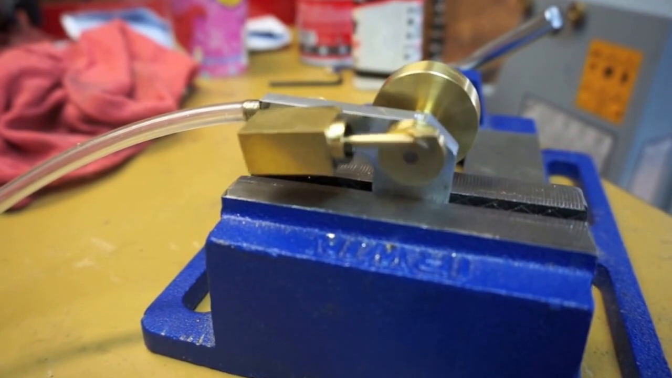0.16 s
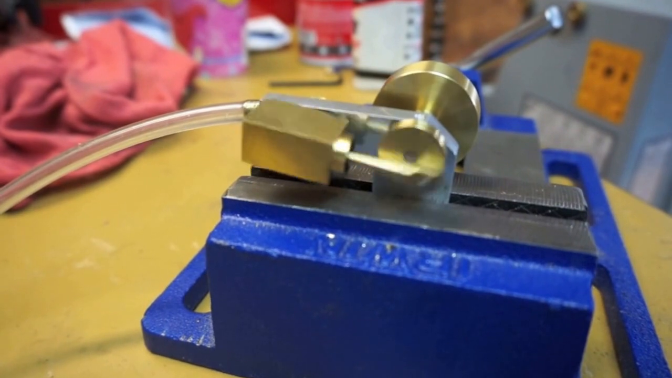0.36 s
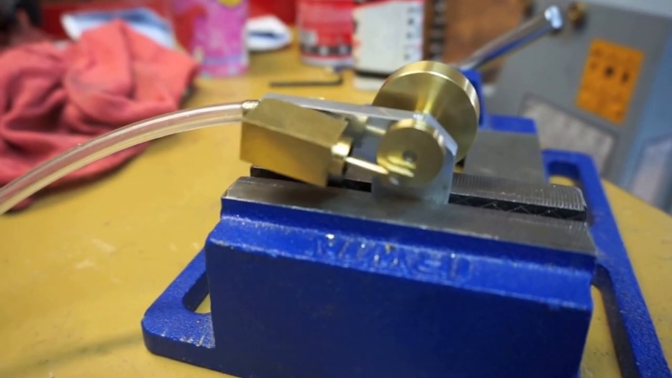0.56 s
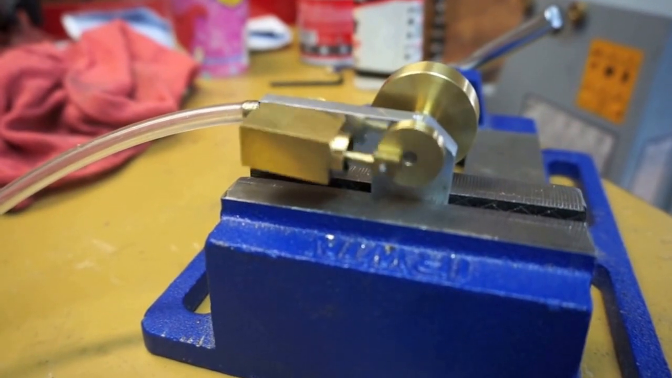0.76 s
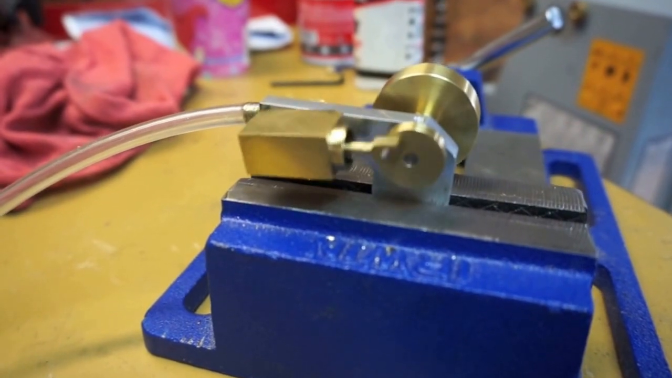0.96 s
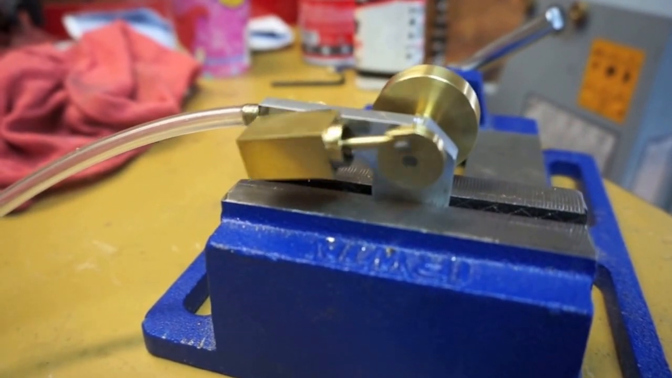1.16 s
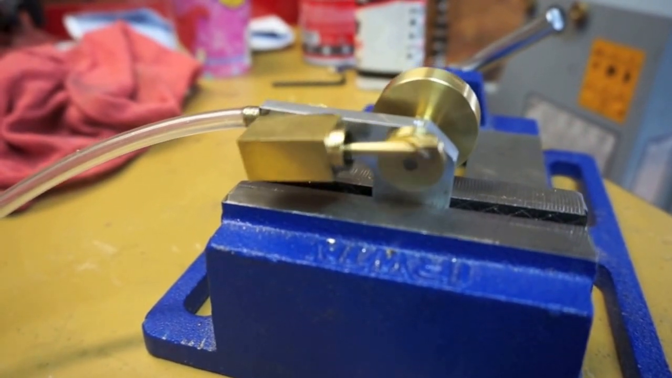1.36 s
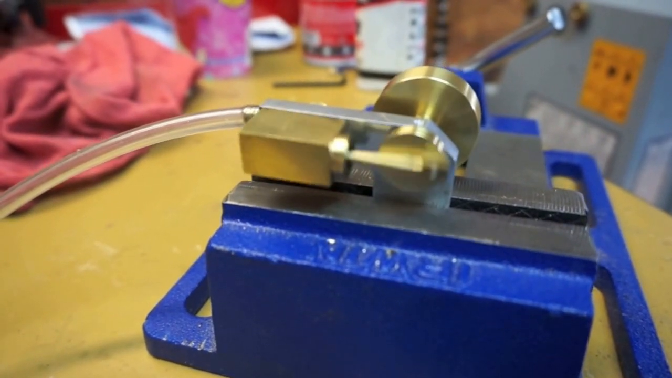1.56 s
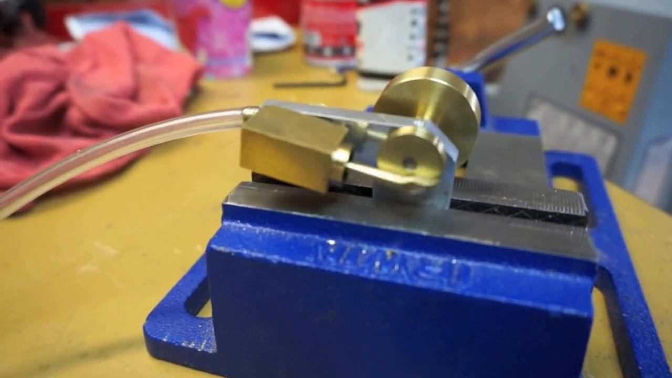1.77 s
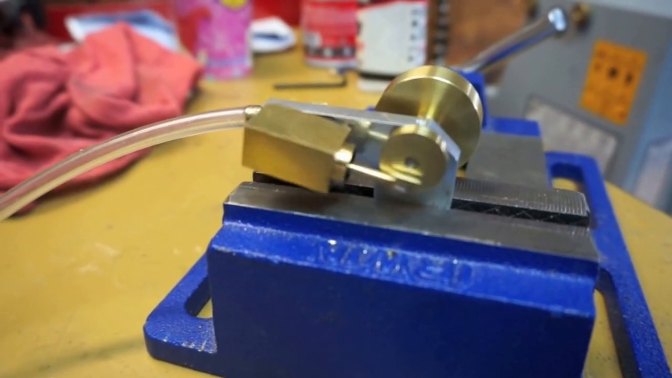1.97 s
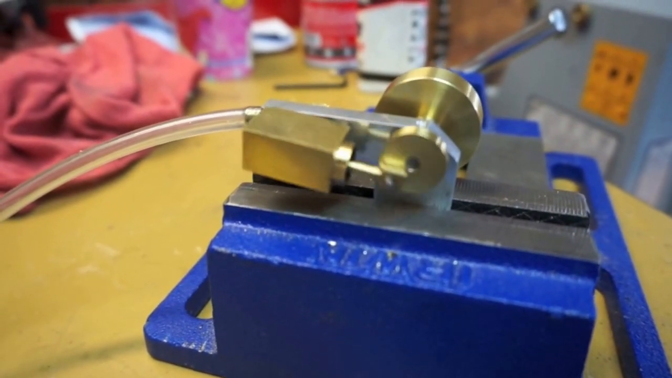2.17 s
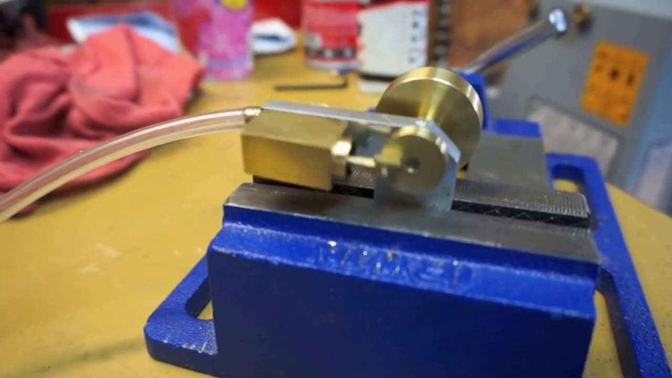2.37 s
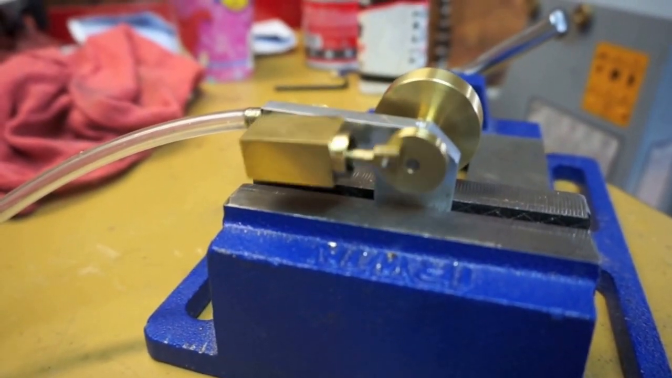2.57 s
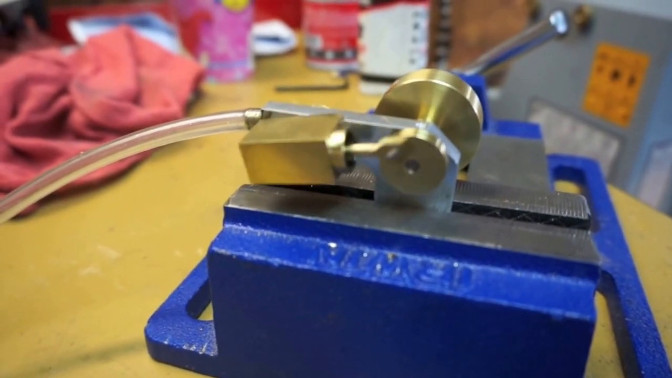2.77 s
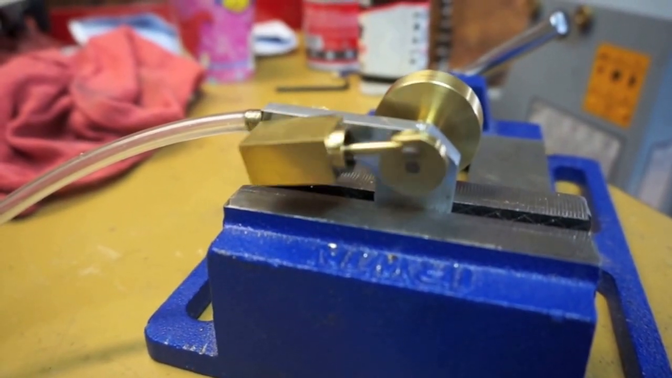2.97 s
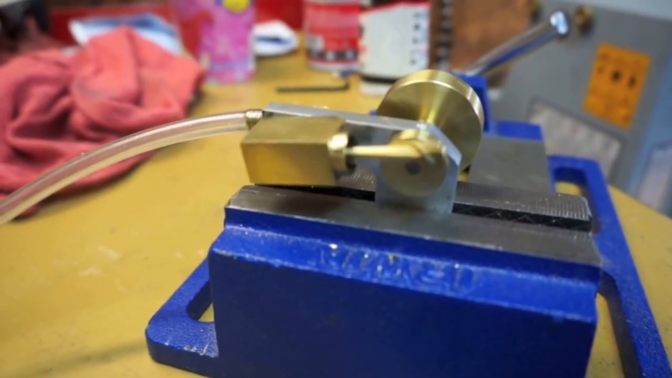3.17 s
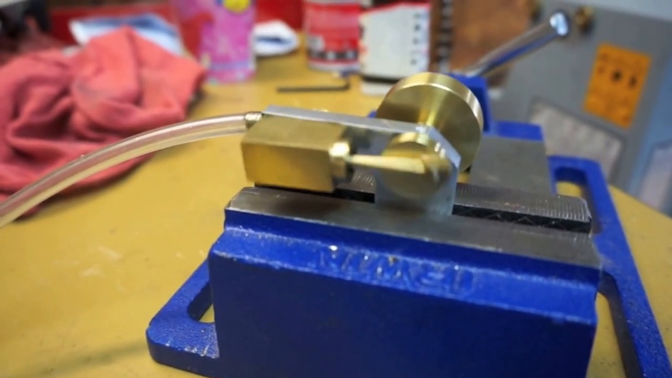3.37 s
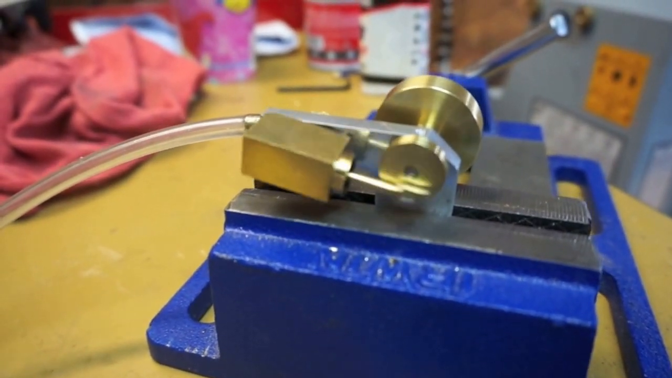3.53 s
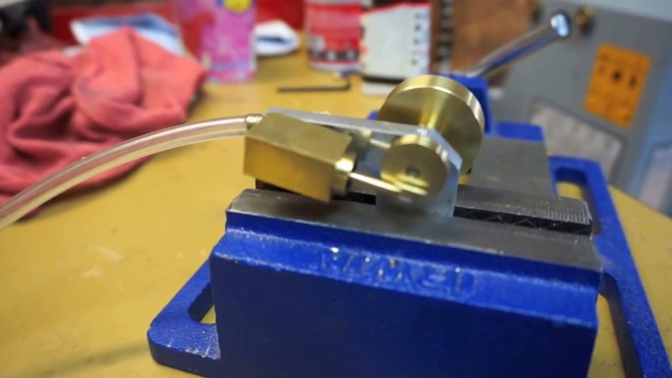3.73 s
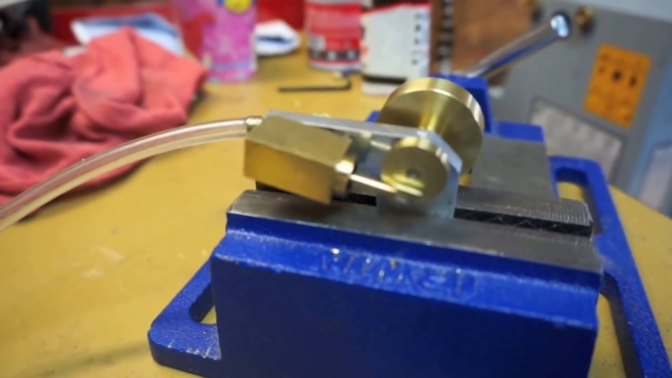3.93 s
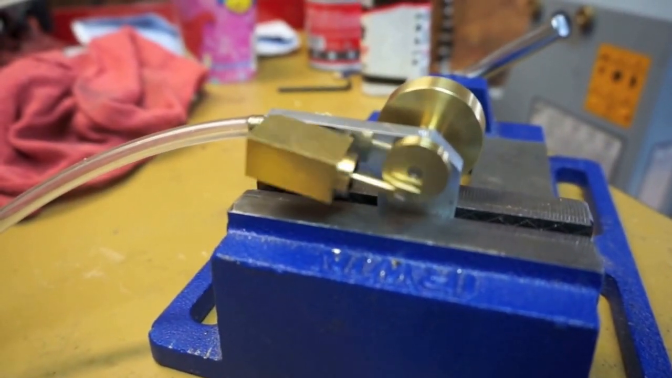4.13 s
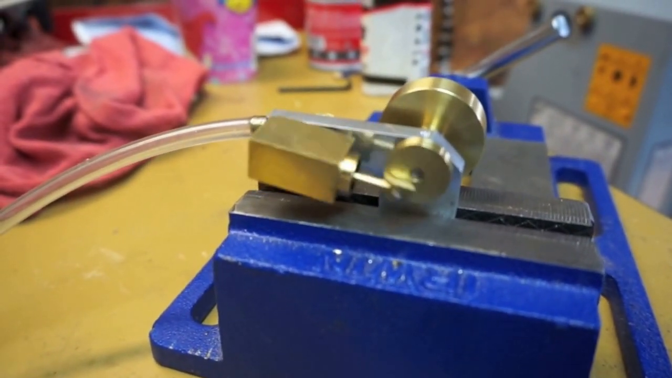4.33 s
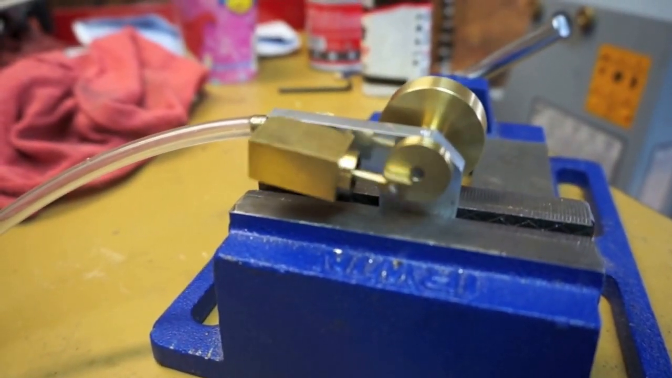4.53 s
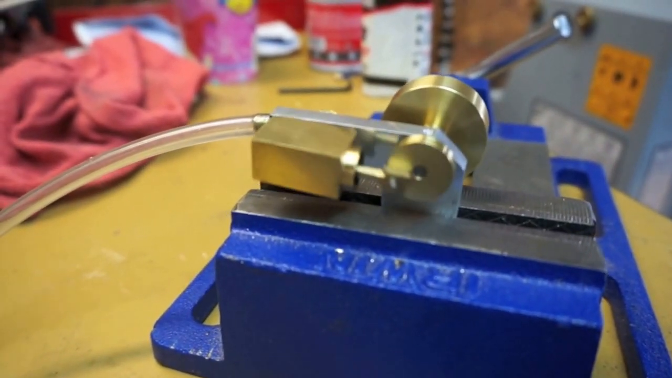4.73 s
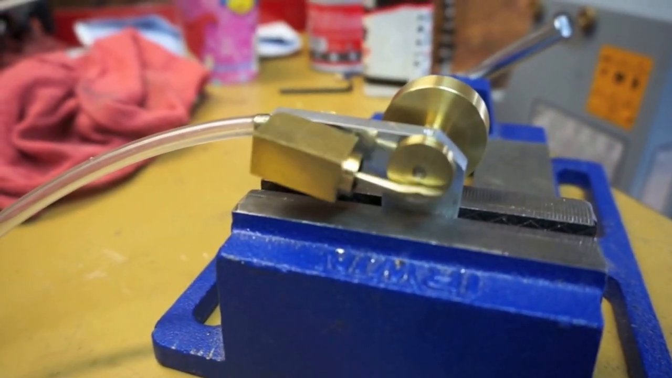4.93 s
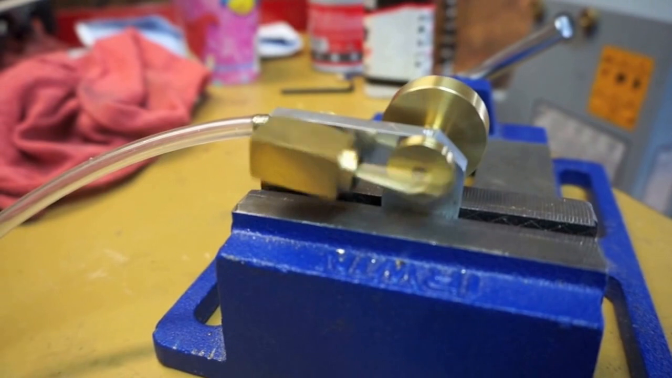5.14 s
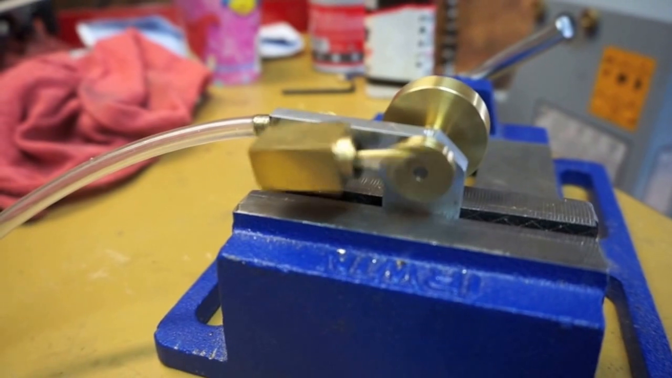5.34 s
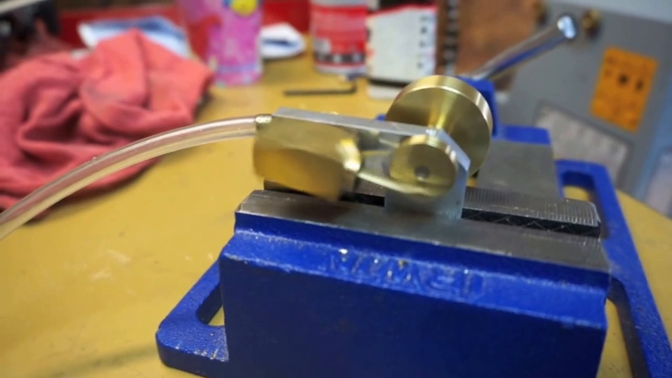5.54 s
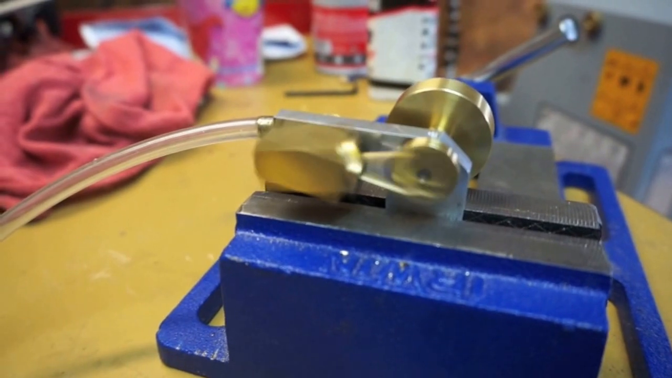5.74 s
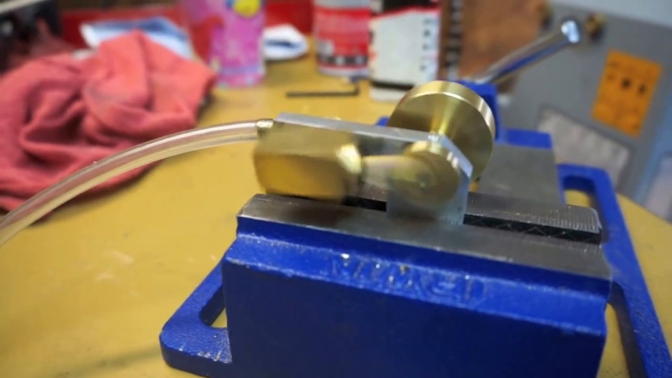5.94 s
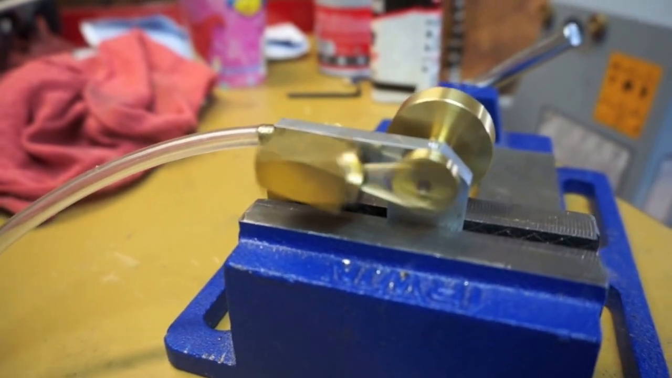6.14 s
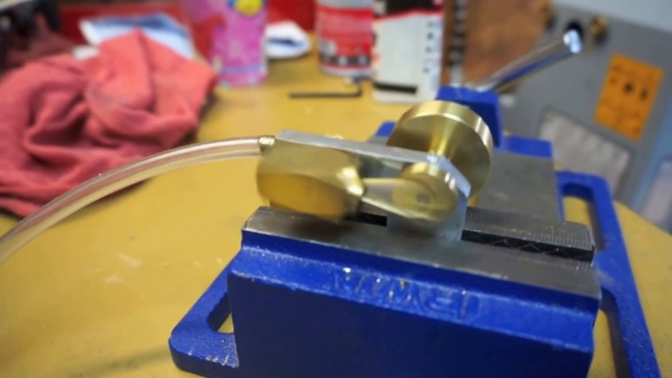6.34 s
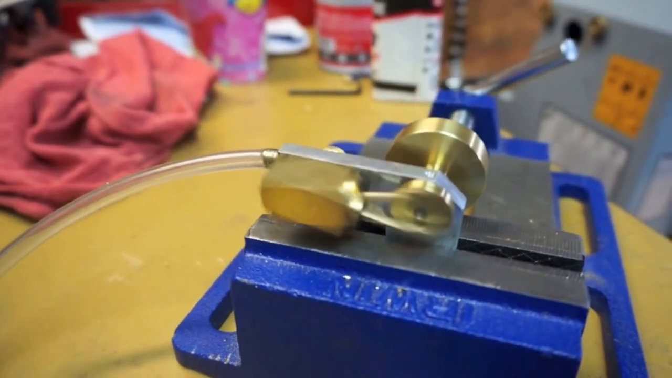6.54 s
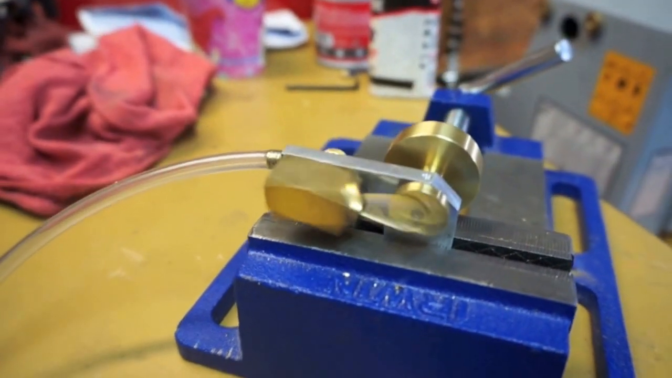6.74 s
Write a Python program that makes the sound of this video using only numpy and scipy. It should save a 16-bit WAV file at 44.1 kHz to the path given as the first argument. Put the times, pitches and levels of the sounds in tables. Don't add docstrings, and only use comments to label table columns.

```python
import sys
import numpy as np
from scipy import signal
from scipy.fft import rfft, irfft, next_fast_len
from scipy.io import wavfile
from scipy.ndimage import uniform_filter1d, map_coordinates

SR = 44100
rng = np.random.default_rng(int(sys.argv[2]) if len(sys.argv) > 2 else 0)


def undo_db(level):
    steps = np.asarray(level, float) / 20
    return 10 ** steps


def persist_wave(psi):
    counts = np.round(np.clip(psi, -1, 1) * 32767).astype(np.int16)
    wavfile.write(sys.argv[1], SR, np.atleast_2d(counts).T)


N = 304290

# time_s, speed_turns_per_s
CRANK_SPEED = [(0.0, 3.55), (0.62, 4.23), (1.09, 4.09), (1.22, 4.32), (2.78, 4.5), (3.25, 4.38), (3.7, 4.9),
               (4.83, 4.68), (5.04, 8.89), (5.18, 11.1), (5.38, 17.76), (5.68, 32.28), (5.87, 37.61),
               (6.14, 41.36), (6.41, 42.4), (6.9, 42.16)]
FULL_SPEED = 42.3


def unit(x):
    return x / np.sqrt(np.mean(x ** 2) + 1e-20)


def curves(rows, at=None):
    places, *columns = np.transpose(rows)
    where = np.arange(N) / SR if at is None else at
    return [np.interp(where, places, column) for column in columns]


def wobble(rate):
    knots = rng.standard_normal(int(N * rate / SR) + 4)
    return map_coordinates(knots, [np.arange(N) * rate / SR])


def coloured(x, points):
    m = next_fast_len(N + 8192)
    hz, db = np.transpose(points)
    log_hz = np.log(np.fft.rfftfreq(m, 1 / SR) + 1)
    gain = undo_db(np.interp(log_hz, np.log(hz + 1), db, left=-120))
    return irfft(rfft(x, m) * gain, m)[..., :N]


def around(rows, turns):
    at, db = np.transpose(rows)
    return np.interp(turns, at, db, period=1)


def passes(turns, at, level_db, scatter_db, jitter_s):
    where = np.flatnonzero(np.diff(np.floor(turns - at)))
    chance = rng.standard_normal((len(where), 2))
    late = np.round(chance[:, 0] * np.broadcast_to(jitter_s, N)[where] * SR).astype(int)
    scatter = np.broadcast_to(scatter_db, N)[where] * chance[:, 1]
    out = np.zeros(N)
    out[np.clip(where + late, 0, N - 1)] = undo_db(level_db[where] + scatter)
    return out


def turbulence(points, spit_db):
    bursts = rng.exponential(size=N) * (rng.random(N) < 1500 / SR)
    spits = signal.lfilter([1], [1, -np.exp(-1 / (0.00036 * SR))], bursts)
    swell_db = spit_db * 3 * np.tanh(unit(spits - spits.mean()) / 3)
    swell_db = swell_db + .3 * spit_db * wobble(120)
    return unit(coloured(rng.standard_normal(N) * undo_db(swell_db), points))


def whistling(x):
    # pitch_hz, width_hz, lift_db
    cavities = [(2640, 110, 2.5), (5950, 86, 4.5), (7060, 890, 5.5), (7850, 1300, 4), (12040, 640, 2.5),
                (13600, 180, 4), (15600, 300, -2.5)]
    m = next_fast_len(N)
    f = np.fft.rfftfreq(m, 1 / SR)
    lift_db = sum(db / (1 + (2 * (f - hz) / width) ** 2) for hz, width, db in cavities)
    return unit(irfft(rfft(x, m) * undo_db(lift_db), m)[:N])


def drive():
    opens_s, open_s = 4.92, 5.06
    speed, = curves(CRANK_SPEED)
    valve, = curves([(opens_s, 0), (open_s, 1)])
    start = curves(CRANK_SPEED, open_s)[0]
    return speed, valve, np.clip((speed - start) / (FULL_SPEED - start), 0, 1)


def full_pressure(speed):
    return np.clip((speed - 6.5) / 10.7, 0, 1)


def merged(climb):
    return np.clip((climb - .86) / (1 - .86), 0, 1)


def raggedness(speed):
    return np.clip(1 - speed / 43, .02, .4)


def shudder(climb):
    return np.exp(-((climb - 0.35) / 0.25) ** 2)


def ducked():
    duck_db, lag_s = 8, .12
    return undo_db(-duck_db * uniform_filter1d(drive()[2], round(2 * lag_s * SR)) ** 1.6)


def leak(turns):
    # angle_turn, level_db
    opening = [(0, -3), (.06, -5.5), (.14, -1.5), (.25, 3.5), (.45, 5), (.53, 6), (.65, 5), (.93, 4.5)]
    # pitch_hz, level_db per Hz
    colour = [(400, -50), (720, -38), (950, -25.5), (1800, -20.5), (2050, -14), (2600, -12.5),
              (4100, -14.5), (4700, -9), (6500, -7), (9200, -5.5), (10500, -0.5), (13000, -2),
              (15000, -0.5), (15800, -4.5)]
    speed, valve, climb = drive()
    pressure = full_pressure(speed)
    level_db = -26 + 4.5 * valve - 30 * climb
    level_db = level_db + (1 - pressure) * around(opening, turns)
    level_db = np.minimum(level_db, -16 - 19 * pressure)
    return undo_db(level_db + 0.75 * wobble(13)) * whistling(turbulence(colour, spit_db=0.5))


def exhaust_puff(turns):
    # angle_turn, level_db
    trickle = [(0, -5.5), (.06, -14), (.64, -23.5), (.69, -1.5), (.76, -1), (.83, 2.5), (.9, -2.5),
               (.95, -2.5)]
    # angle_turn, level_db
    blown = [(0, -1), (.045, -2), (.08, -18), (.54, -18), (.62, -2), (.75, 0), (.9, -1)]
    # pitch_hz, level_db per Hz
    colour = [(300, -25), (720, -15), (950, -19), (1300, -13), (1800, -14), (2050, -5.5), (2500, -4),
              (4200, -10), (5000, -5), (6500, -3.5), (9200, -3.5), (11500, -1.5), (14500, -17),
              (15800, 0.5)]
    speed, valve, climb = drive()
    pressure = full_pressure(speed)
    level_db = -21.5 + 2 * valve - 12.5 * climb - 10 * merged(climb)
    port_db = (1 - pressure) * around(trickle, turns) + pressure * around(blown, turns)
    gain = undo_db(level_db + port_db + 1.57 * wobble(25))
    return gain * whistling(turbulence(colour, spit_db=1.0))


def exhaust_pop(turns):
    speed, valve, climb = drive()
    level_db = -28.5 + 4.5 * (np.minimum(speed, 5) - 4.4) - 2.5 * valve
    level_db = level_db - 17 * climb - 9 * merged(climb)
    pop = passes(turns, .685, level_db, scatter_db=1.8, jitter_s=.0015)
    pop += passes(turns, .49, level_db - 13, scatter_db=2.5, jitter_s=.004)
    pop += passes(turns, .99, level_db - 15, scatter_db=2.5, jitter_s=.004)
    return pop


def vice(pop, clack, rattle):
    # pitch_hz, t60_s, pop_db, clack_db, rattle_db
    modes = [(206, 0.11, -27, -15, -18.5), (348, 0.024, 9, -5, -38), (419.4, 0.07, -14.5, -11, -10.5),
             (543, 0.069, -11, -13.5, -23), (721.6, 0.073, -1.5, -39, 2), (852, 0.066, -36, -31, -21),
             (928, 0.08, -26, -12, -26), (1207, 0.011, 0, 6, 3), (1435, 0.052, -35, -11.5, -16),
             (1587, 0.015, -11, -32, -3.5), (2045, .05, -10, 3, -12), (2092, .05, -10, 3, -12),
             (2846, 0.026, 0, 0.5, 3.5), (3140, 0.028, -2.5, 0.5, -6), (3530, 0.017, 0.5, -4, -4)]
    # pitch_hz, left_minus_right_db
    lean = [(400, 0), (720, 3), (1300, .5), (2000, -2), (3200, -2), (4400, 0)]
    t = np.arange(SR // 4) / SR
    out = np.zeros((2, N))
    for k, (hz, t60, by_pop, by_clack, by_rattle) in enumerate(modes):
        ring = (-1) ** k * np.sin(2 * np.pi * hz * t) * undo_db(-60 * t / t60)
        by_frame = ring * (1 - np.exp(-t * hz / 5)) ** 2
        sound = signal.fftconvolve(undo_db(by_pop + 3.5) * pop, by_frame)
        sound += signal.fftconvolve(undo_db(by_clack) * clack, ring * (1 - np.exp(-t / 0.0026)))
        sound += signal.fftconvolve(undo_db(by_rattle) * rattle, ring * (1 - np.exp(-t / 0.0016)))
        lean_db = curves(lean, hz)[0] / 2
        out += sound[:N] * undo_db([[lean_db], [-lean_db]])
    return out


def workshop():
    # pitch_hz, level_db rms
    mains = [(59.2, -62), (118.4, -61.5), (242.2, -63.5)]
    # pitch_hz, level_db per Hz
    rumble = [(12, -37), (20, 0), (48, -3.5), (112, 0), (184, -3), (236, 0), (441, -10), (700, -4.5),
              (910, -16.5), (1540, -120)]
    t = np.arange(N) / SR
    hum = np.zeros(N)
    for hz, db in mains:
        gain = np.sqrt(2) * undo_db(db + 0.84 * wobble(4.52))
        hum += gain * np.sin(2 * np.pi * hz * t + 1.0 * wobble(5.14))
    return ducked() * (hum + undo_db(-54.5) * unit(coloured(rng.standard_normal(N), rumble)))


def room_tone():
    # pitch_hz, level_db per Hz
    colour = [(60, -22), (206, -11), (700, -11), (1630, -21), (2570, -0.5), (4720, -8.5), (5600, -11),
              (6500, -60)]
    tone = undo_db(-49.5) * ducked() * unit(coloured(rng.standard_normal(N), colour))
    return tone * [[1], [-1]]


def walls(x):
    # pitch_hz, level_db
    colour = [(60, -40), (200, -34), (400, -22), (760, -8), (1300, -13), (2400, -6), (4400, -11),
              (6000, -30.5)]
    t = np.arange(SR // 20) / SR
    tail = rng.standard_normal(len(t)) * undo_db(-60 * t / 0.29)
    side = coloured(signal.fftconvolve(x, tail / np.linalg.norm(tail))[:N], colour)
    return np.array([side, -side])


def jet(turns):
    # angle_turn, level_db
    opening = [(.0, 6), (.13, -2), (.3, -1.5), (.44, -5.5), (.48, 4), (.68, -2), (.76, 5), (.88, -6),
               (.96, -1.5)]
    # pitch_hz, level_db per Hz
    colour = [(6000, -48), (8300, -27), (9300, -11), (10300, -5), (11500, -1), (12500, 0), (13400, -3),
              (14000, -1), (14700, -5), (15200, -3), (15800, -6)]
    speed, valve, climb = drive()
    level_db = -53.5 + 33.5 * valve - 3.5 * climb
    depth = np.clip(speed / 38, 0, 1) ** 1.6
    chop_db = depth * (around(opening, turns) + 3.5)
    return undo_db(level_db + chop_db + 1.2 * wobble(30)) * turbulence(colour, spit_db=2.1)


def spray(turns):
    # angle_turn, level_db
    opening = [(.05, 2.5), (.13, 0), (.3, -3.5), (.49, -6), (.7, -8.5), (.77, -2), (.88, -7), (.98, 2)]
    # pitch_hz, level_db per Hz
    colour = [(1500, -10), (2400, -2), (3500, -2), (4500, -1.5), (5400, -1), (6500, 0), (8500, -2),
              (10000, -1.5), (12000, -30)]
    climb = drive()[2]
    level_db = -53.5 + 21 * (1 - np.exp(-climb / 0.12))
    return undo_db(level_db + around(opening, turns) + 5.0) * turbulence(colour, spit_db=1.8)


def piston_clack(turns):
    # time_s, tick_peak_db, ring_below_it_db
    hardest = [(5.1382, -10, -20), (5.2277, -13, -20), (5.2998, -9, -16), (5.3606, -10.5, -14),
               (5.4153, -14.5, -10.5), (5.463, -11.5, -12.5), (5.5072, -9, -13.5), (5.5468, -13.5, -11.5),
               (5.5855, -15, -9.5), (5.6197, -17, -6.5), (5.6535, -16, -14), (5.684, -21, -2.5),
               (5.7144, -16.5, -7.5), (5.7429, -27.5, 1), (5.7736, -18, -5.5), (5.8002, -15, -10)]
    speed, valve, climb = drive()
    ragged = raggedness(speed)
    clack_db = -29 + 37 * (1 - climb)
    clack = passes(turns, 0, clack_db, scatter_db=8 * ragged + 1.6, jitter_s=.001 * ragged)
    clack[:round((hardest[-1][0] + .5 / FULL_SPEED) * SR)] = 0
    strike = clack * undo_db(-25 - clack_db)
    for s, db, ring_db in hardest:
        strike[round(s * SR)] = undo_db(db + 7)
        clack[round(s * SR)] = undo_db(db + ring_db + 3.0)
    return strike, clack


def bright_tick(strike):
    t = np.arange(SR // 4) / SR
    tick = np.sin(2 * np.pi * 4300 * t)
    tick += 0.25 * np.sin(2 * np.pi * 5600 * t)
    tick += 0.26 * np.sin(2 * np.pi * 7800 * t)
    tick *= undo_db(-60 * t / 0.0038) * (1 - np.exp(-t / 0.00016))
    return signal.fftconvolve(strike, tick)[:N]


def linkage_rattle(turns):
    # angle_turn, level_db, push (+) or pull (-) factor
    knocks = [
        (.04, 5.5, 0.52),
        (0.189, 5.5, 0.78),
        (.77, -2.5, -1.2),
        (.9, -4.5, 1),
    ]
    speed, valve, climb = drive()
    ragged = raggedness(speed)
    level_db = -31 + 23.5 * np.log10(speed / FULL_SPEED)
    level_db = level_db + 6 * shudder(climb) + 3 * merged(climb)
    rattle = np.zeros(N)
    for at, db, push in knocks:
        rattle += push * passes(turns, at, level_db + db, 5 * ragged + 1.2, jitter_s=.0012 * ragged)
    return rattle


def bench_drum(turns):
    # multiple of the crank speed, level_db
    harmonics = [(1, -33), (2, -24), (3, -7), (4, -11), (5, -8), (6, -13), (7, -2.5), (8, -9.5), (9, -7.5),
                 (10, -1)]
    speed, valve, climb = drive()
    ragged = raggedness(speed)
    level_db = -42.5 + 34 * np.log10(speed / FULL_SPEED)
    level_db = level_db + 4.5 * shudder(climb) + 3 * merged(climb)
    drum = np.zeros(N)
    for k, db in harmonics:
        phase = k * turns + rng.random() + 0.63 * ragged * wobble(40)
        drum += undo_db(db + 9 * ragged * wobble(40)) * np.sin(2 * np.pi * phase)
    return undo_db(level_db) * drum


def metal(turns):
    # pitch_hz, level_db
    metal_tone = [(20, -40), (50, -31), (90, 6.5), (130, 0.5), (16000, -0.5)]
    strike, clack = piston_clack(turns)
    ring = vice(exhaust_pop(turns), clack, linkage_rattle(turns))
    return coloured(ring + bright_tick(strike) + bench_drum(turns), metal_tone)


def scene():
    turns = .216 + np.cumsum(curves(CRANK_SPEED)[0]) / SR
    breath = leak(turns) + exhaust_puff(turns) + jet(turns) + spray(turns)
    iron = metal(turns)
    reflections = walls(undo_db(-11.5) * breath + undo_db(-6) * iron.mean(0))
    return breath + iron + workshop() + reflections + room_tone()


def band_limit(x):
    return signal.sosfilt(signal.butter(12, 16970, fs=SR, output="sos"), x)


def record(dry):
    mix = coloured(dry, [(0, 0), (15715, 0), (15730, -200)])
    return band_limit(mix)


dry = scene()
out = record(dry)
persist_wave(out)
```